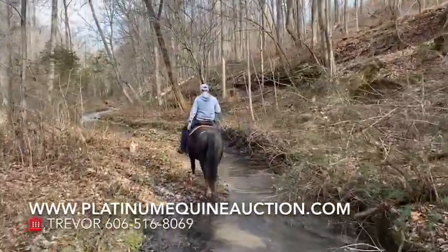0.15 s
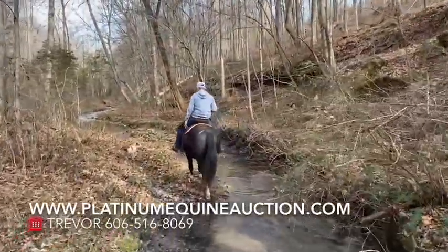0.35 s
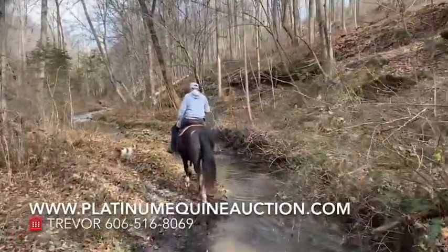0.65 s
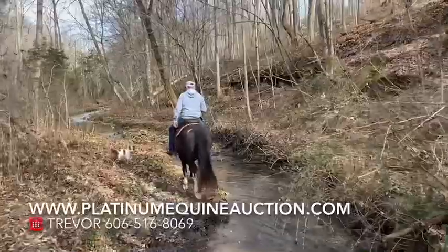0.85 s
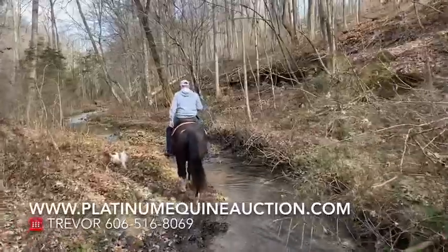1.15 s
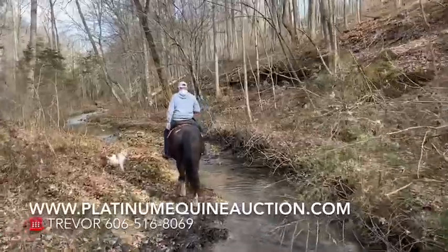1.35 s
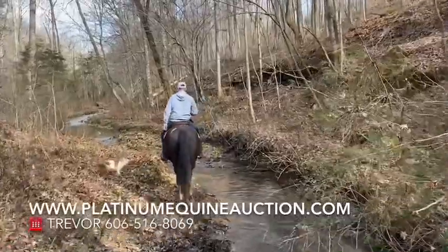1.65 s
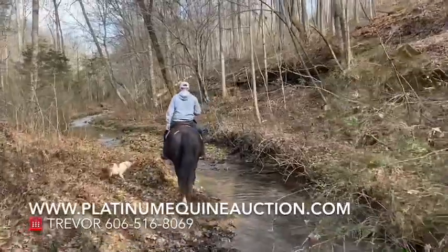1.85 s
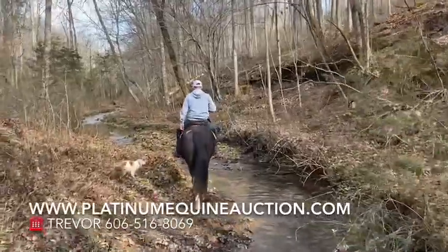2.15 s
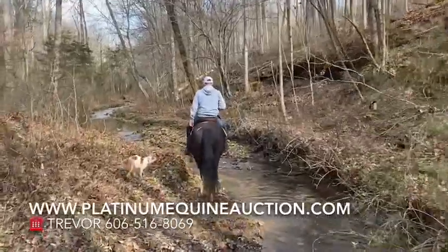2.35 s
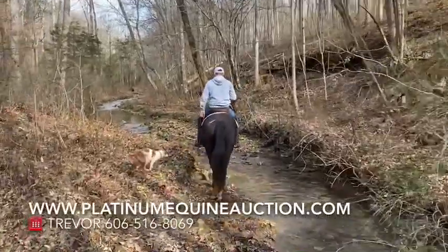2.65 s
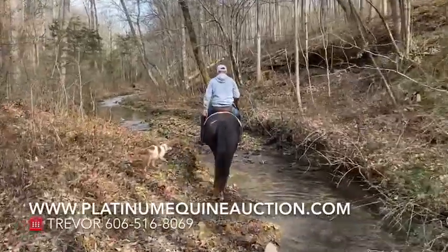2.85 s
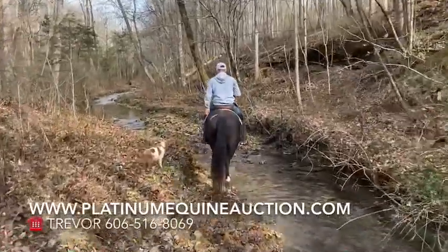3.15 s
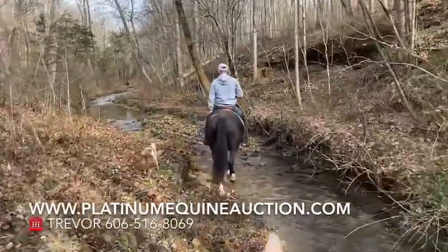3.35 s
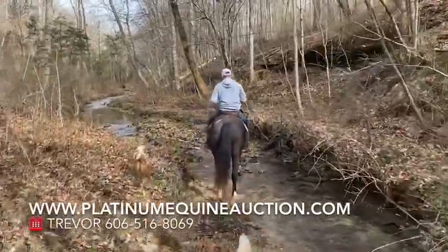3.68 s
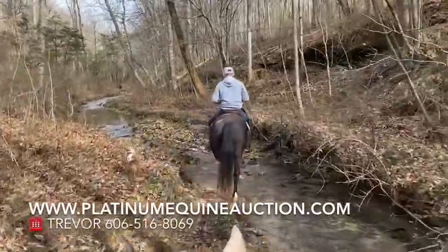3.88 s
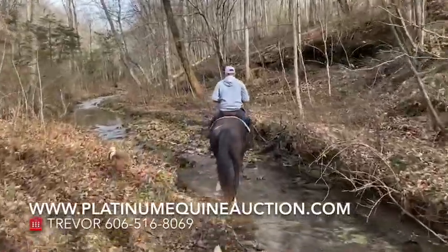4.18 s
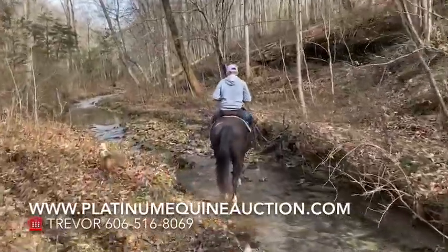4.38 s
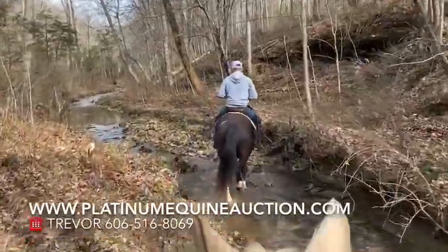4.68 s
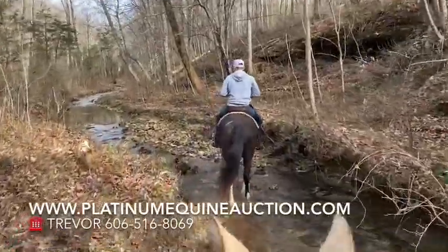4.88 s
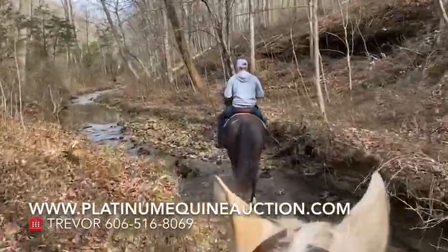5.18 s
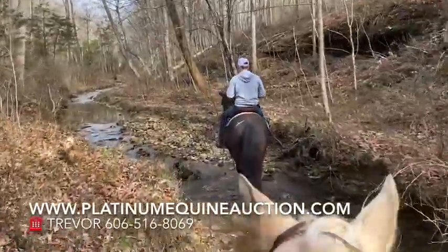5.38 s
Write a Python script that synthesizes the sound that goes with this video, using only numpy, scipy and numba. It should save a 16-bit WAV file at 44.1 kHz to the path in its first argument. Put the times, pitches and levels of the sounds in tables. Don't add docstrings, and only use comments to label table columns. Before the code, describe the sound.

Horses walk through a shallow creek, hooves splashing, plopping and thudding on the stream bed, with gurgles, spatter and a faint far engine.

```python
import sys
import numpy as np
from scipy import signal
from scipy.fft import rfft, irfft, next_fast_len
from scipy.io import wavfile
from scipy.ndimage import uniform_filter1d, map_coordinates
from numba import njit

SR = 44100
rng = np.random.default_rng(int(sys.argv[2]) if len(sys.argv) > 2 else 0)


def volts_from_db(level):
    exponent = np.asarray(level, float) / 20
    return 10 ** exponent


def dump_mix(stems):
    frames = np.atleast_2d(stems).T
    limited = np.clip(frames, -1, 1)
    pcm = np.round(limited * 32767).astype(np.int16)
    wavfile.write(sys.argv[1], SR, pcm)


N = 243431

# start_s, first_pitch_hz, last_pitch_hz,
# peak_db, last_gulp_db
HOOF_PLUNGES = [(.51, 635, 338, -16.5, -17.5), (1.224, 826, 170.8, -17.5, -24), (1.365, 775, 386, -19, -23),
                (1.974, 710, 164.6, -15, -22.5), (2.067, 417, 194, -17.5, -28),
                (2.537, 1036, 155, -25, -21), (3.247, 1150, 434, -21.5, -23),
                (3.738, 698, 92.7, -16.5, -24.5), (4.326, 532, 280, -24.5, -19.5),
                (4.718, 1444, 172, -16, -20.5), (5.407, 680, 184, -26, -16.5)]

APART_HZ = 7500
IN_STEP_HZ, HALF_TURN_HZ = 6970, 2040


def unit(x):
    return x / np.sqrt(np.mean(x ** 2) + 1e-20)


def along(points, hz):
    f, v = np.transpose(points)
    return np.interp(np.log(hz + 1), np.log(f + 1), v)


def curves(rows):
    s, *cols = np.transpose(rows)
    return [np.interp(np.arange(N) / SR, s, c) for c in cols]


def wobble(rate):
    knots = rng.standard_normal(int(N * 60 / SR) + 4)
    return map_coordinates(knots, [np.arange(N) * rate / SR])


def filtered(x, response):
    m = next_fast_len(N + SR // 2)
    return irfft(rfft(x, m) * response(np.fft.rfftfreq(m, 1 / SR)), m)[..., :N]


def coloured_noise(spectrum, noise):
    return unit(filtered(noise, lambda hz: volts_from_db(along(spectrum, hz))))


@njit
def bubbles(s, hz, size, cycles, phase, onset, glide, count, sr):
    out = np.zeros(count)
    for k in range(len(s)):
        life = cycles[k] / hz[k] * sr
        mid = int(s[k] * sr)
        for i in range(max(0, mid - int(2 * life)), min(count, mid + int(3 * life))):
            u = (i - mid) / life
            v = u / onset if u < 0 else u / (2 - onset)
            turns = cycles[k] * u * (1 + glide * u)
            out[i] += size[k] * np.exp(-2.77 * v * v) * np.sin(2 * np.pi * turns + phase[k])
    return out


def typed(rows, onset, glide):
    s, hz, db, cycles = np.transpose(rows).astype(float)
    phase = 2 * np.pi * rng.random(len(s))
    return bubbles(s, hz, volts_from_db(db), cycles, phase, onset, glide, N, SR)


def swarm(spectrum, centre_hz, octaves, cycles, spread_db, noise_share, count):
    pair = []
    for _ in range(2):
        u, g = rng.random((count, 3)), rng.standard_normal((count, 2))
        size = volts_from_db(spread_db * np.minimum(-np.log(1 - u[:, 1]), np.sqrt(3)))
        hz = np.clip(centre_hz * 2 ** (octaves * g[:, 0]), 40, SR / 2.5)
        lengths = cycles * np.exp(0.4 * g[:, 1])
        grains = bubbles(u[:, 0] * N / SR, hz, size, lengths, 2 * np.pi * u[:, 2], 0.35, 0.015, N, SR)
        z = rfft(grains)
        power = np.abs(uniform_filter1d(np.abs(z) ** 2, size=1500))
        flat = irfft(z / np.sqrt(power + power.max() / 20), N)
        share = np.clip(noise_share, 0, 1)
        pair.append(np.sqrt(1 - share) * unit(flat) + np.sqrt(share) * rng.standard_normal(N))
    return coloured_noise(spectrum, np.array(pair))


def swells(rows, rise):
    t = np.arange(N) / SR
    return np.sqrt(sum(volts_from_db(2 * db - 20 * np.maximum(t - s, (s - t) / rise) / fall) for s, db, fall in rows))


def valley_rumble():
    # frequency_hz, level_db_per_hz
    rumble_spectrum = [(12, -36), (20, -29), (47, 4.5), (97, 1.5), (160, -5), (210, -17), (350, -120)]
    rumble = coloured_noise(rumble_spectrum, rng.standard_normal((2, N)))
    return volts_from_db(-46.0 + 0.84 * wobble(3.475)) * rumble


def water():
    # time_s, mist_db
    wash = [(0, -50.5), (.3, -42.5), (.6, -47), (.92, -48.5), (1.18, -49), (1.4, -41), (1.6, -51.5),
            (1.8, -51), (1.96, -44.5), (2.15, -53.5), (2.4, -51.5), (2.54, -43), (3.05, -53.5),
            (3.14, -50.5), (3.3, -54.5), (4.2, -56), (5.0, -55.5), (5.52, -54)]
    # peak_s, peak_db, fall_10db_s
    kick_rows = [(.29, -40.5, 0.41), (.84, -43, 0.13), (1.42, -38, 0.15), (1.65, -42, 0.1),
                 (1.96, -40.5, 0.16), (2.2, -37.5, 0.03), (2.54, -42, .1), (2.65, -44.5, 0.24),
                 (3.13, -43, 0.16), (3.33, -40.5, 0.1125), (3.63, -40, 0.01), (3.74, -39, 0.0962),
                 (4.01, -41, 0.0647), (4.34, -37.5, 0.07), (1.09, -44, 0.05), (4.75, -42.5, 0.11),
                 (4.92, -46, 0.02), (5.345, -45, 0.06), (5.12, -42.5, 0.0854), (5.4, -38.5, 0.08)]
    # peak_s, peak_db, fall_10db_s
    push_rows = [(.28, -30, 0.08), (.59, -36.5, 0.1), (.84, -27.5, 0.0308), (1.12, -33, 0.05),
                 (1.22, -20, 0.0011), (1.41, -26, 0.01), (1.51, -42, 0.1), (1.68, -28.5, 0.04),
                 (1.81, -42, 0.3), (2.0, -31, 0.05), (2.25, -31.5, 0.0572), (2.41, -36, 0.04),
                 (2.575, -33, 0.11), (2.875, -32, 0.09), (3.21, -36.5, 0.13), (3.42, -35.5, 0.13),
                 (3.6, -34.5, 0.13), (3.83, -38, 0.13), (4.06, -37, 0.08), (4.165, -37.5, 0.09),
                 (4.42, -41.5, 0.25), (4.77, -34.5, 0.08), (4.68, -37.5, 0.06), (5.15, -37, 0.07),
                 (2.37, -35.5, .06), (1.065, -34.5, .05), (5.41, -26.5, 0.05), (.05, -39, 0.24)]
    # frequency_hz, level_db_per_hz
    churn_spectrum = [(35, -19.5), (60, -2.5), (90, -0.5), (151, -5.5), (281, 0.5), (403, -8), (595, -5.5),
                      (1570, -18), (2500, -20), (3250, -62), (5500, -120)]
    crackle_spectrum = [(700, -2), (1600, -15.5), (4500, -21.5)]
    spray_spectrum = [(530, 1.5), (900, -4.5), (1080, -6), (1620, -7.5), (3760, -9), (5730, -12.5),
                      (7170, -20), (8400, -12), (10900, -59), (18500, -120)]
    mist_spectrum = [(5000, -7), (6000, -6), (7200, -1.5), (8500, -5.5), (10500, -9), (13000, -16),
                     (16000, -22)]

    wash_db, = curves(wash)
    swing_db = wash_db - wash_db.mean()
    kicks = swells(kick_rows, rise=.55)
    pushes = swells(push_rows, rise=0.65)
    spray_gain = np.hypot(kicks, volts_from_db(-50 + 0.56 * swing_db))
    mist_gain = np.hypot(volts_from_db(-11) * kicks, volts_from_db(wash_db))
    churn_gain = np.hypot(pushes, volts_from_db(-47 + 0.247 * swing_db))

    churn = swarm(churn_spectrum, centre_hz=550, octaves=1.1, cycles=3.6, spread_db=2.2,
                  noise_share=.33, count=4500)
    spray = swarm(spray_spectrum, centre_hz=2575, octaves=.9, cycles=4.4, spread_db=3.5,
                  noise_share=0.58, count=9000)
    mist = swarm(mist_spectrum, centre_hz=8820, octaves=0.46, cycles=2.4, spread_db=2.0,
                 noise_share=0.58, count=14000)
    crackle = swarm(crackle_spectrum, centre_hz=1700, octaves=0.622, cycles=5.5, spread_db=2.5,
                    noise_share=0.32, count=2500)
    surge = wobble(48)
    return (churn_gain * volts_from_db(-1.4 + 1.9 * surge) * (churn + volts_from_db(-8.5) * crackle)
            + spray_gain * volts_from_db(2.0 + .9 * surge + 1.5 * wobble(30)) * spray
            + mist_gain * volts_from_db(1.55 + .8 * surge + 1.2 * wobble(21.98)) * mist)


def froth(count, up=1, over_db=0):
    # start_s, length_s, middle_pitch_hz, peak_db
    collapses = [(0.247, .025, 805, -24.5), (.272, .04, 960, -25), (.826, 0.0196, 798, -29.5),
                 (.886, 0.02324, 813, -28.5), (.44, .025, 990, -31), (1.389, .014, 806, -24.5),
                 (2.003, .018, 650, -28), (3.22, 0.00822, 703, -30.5), (3.765, .014, 1510, -32.5),
                 (3.914, .02, 1250, -31), (4.15, .03, 398, -35), (1.418, .014, 750, -28.5),
                 (5.391, 0.0116, 860, -30.5)]
    s, length, hz, db = np.transpose(collapses)[:, :, None]
    when = rng.random((len(collapses), count))
    size, loud, life = rng.standard_normal((3, len(collapses), count))
    starts = s + length * (np.arange(count) + when) / count
    pitches = up * hz * 2 ** (.33 * size)
    levels = db + over_db + 2 * loud
    cycles = 2.7 * 2 ** (life / 2)
    cols = (starts, pitches, levels, cycles)
    return list(np.reshape(cols, (len(cols), -1)).T)


def plunges():
    gulp_cycles = [1.57, 2.54, 1.8]
    rows = []
    for s, first_hz, last_hz, db, last_db in HOOF_PLUNGES:
        hz = np.geomspace(first_hz, last_hz, 3)
        starts = s + 0.9 * (np.cumsum(1 / hz) - 1 / first_hz)
        rows += zip(starts, hz, (db, db - 4, last_db), gulp_cycles)
    return rows


def bank_scatter(near):
    # frequency_hz, t60_s
    banks = [(100, 0.072), (1000, 0.068), (8000, 0.024)]
    hz, t, z = signal.stft(rng.standard_normal((2, SR // 4)), SR, nperseg=256)
    tail = signal.istft(z * volts_from_db(-60 * t / along(banks, hz)[:, None]), SR, nperseg=256)[1]
    late = np.pad(near, (int(.003 * SR), 0))[None]
    return signal.fftconvolve(late, tail / np.linalg.norm(tail[0]), axes=1)[:, :N]


def hooves():
    # peak_s, pitch_hz, peak_db, length_cycles
    thuds_and_pockets = [(.008, 265.7, -28, 6.8), (.074, 265, -22, 2.35), (.232, 157, -25, 1.5),
                         (.568, 279, -22.5, 2.4), (.823, 264, -27, 3.8), (1.442, 106.8, -19, 1.3),
                         (1.511, 155, -22, 0.92), (1.669, 212, -24, 3.2), (1.723, 250, -25, 2.3),
                         (1.748, 243, -19, 1.3), (1.768, 92.7, -16, 2.3), (2.345, 78.5, -22.5, 3.3),
                         (2.383, 142.6, -28, 4), (2.42, 244.5, -17.5, 1.22), (2.606, 256, -21, 1.14),
                         (2.699, 98, -25.5, 3.8), (5.21, 119, -26, 1.5), (3.2, 160, -18.5, 1.6),
                         (3.335, 190, -25.5, 2.4), (3.417, 265, -17.5, 1.4), (3.579, 241, -18, 0.47),
                         (3.65, 217, -21, 1.38), (3.697, 245, -25.5, 2), (.846, 352, -19, 2.7),
                         (1.229, 284, -20.5, 3.2), (1.422, 250, -25, 2.1), (4.78, 188, -30, 12), (4.174, 650, -27, 2.8),
                         (3.81, 500, -27, 2.3), (.63, 201, -30.5, 5.8),
                         (.028, 315, -26, 5.9), (.071, 527, -27.5, 3.9), (.253, 324, -22, 2.9),
               (0.2786, 520, -17.5, 2.1), (.34, 973, -28, 4.5), (4.396, 762, -16.5, 3.6),
               (.835, 774.7, -21.5, 8.5), (.836, 368, -19.5, 8.3), (.856, 330, -13.5, 2.5),
               (.859, 639, -19.5, 4.14), (.867, 304, -15, 2.66), (1.1, 401, -17.5, 2.51),
               (1.194, 313, -24, 2.75), (1.275, 1363, -22.5, 3.2), (1.422, 450, -22.5, 2.06),
               (1.658, 583, -29.5, 10), (1.697, 310, -19, 3.1), (1.816, 311.5, -19.5, 1.78),
               (2.015, 370, -24, 5.3), (2.082, 788, -22.5, 2.48), (2.26, 547, -19, 2.7),
               (2.272, 460, -19.5, 1.5), (2.279, 326, -19.5, 3.55), (2.568, 832, -25.5, 4.7),
               (2.573, 424, -23.5, 5.4), (3.25, 623, -17, 3.7), (3.321, 383, -25, 3.3),
               (3.489, 559, -23, 3.14), (3.602, 666, -22, 3.3), (4.154, 295, -31.5, 5.5)]
    # peak_s, pitch_hz, peak_db, length_cycles
    drops = [(.234, 2970, -24.5, 4), (.246, 7470, -24.5, 4.7), (.293, 1700, -22, 2),
             (.463, 6400, -13.5, 1.3), (.799, 2574, -24, 3.45), (.801, 1980, -22.5, 5),
             (.908, 1460, -18.5, 1.96), (.409, 850, -22.5, 2.5), (1.391, 1493, -18, 1.74),
             (1.412, 2396, -18.5, 2.9), (1.425, 2070, -23.5, 4), (1.434, 2880, -22, 1.7),
             (1.864, 5400, -20.5, 1.25), (1.873, 4910, -23, 5.6), (1.972, 2711, -20.5, 4.8),
             (2.137, 2330, -21.5, 1.73), (2.524, 2855, -16, 1.8), (2.525, 4400, -17.5, 2.2),
             (2.537, 4470, -21.5, 3.3), (3.328, 2630, -21.5, 1.8), (3.345, 2250, -25, 3.6),
             (3.633, 3720, -18, 2.6), (1.206, 2510, -28.5, 5.1), (4.367, 2050, -23, 2.3),
             (4.462, 1950, -27.5, 1.8), (4.704, 3200, -25.5, 1.2), (5.113, 3210, -22.5, 2),
             (5.388, 3760, -16.5, 3.6), (5.397, 4030, -19.5, 3.2)]
    droplets = froth(count=9, up=2.2, over_db=-7.5)
    plops = thuds_and_pockets + froth(count=6) + droplets
    ticks = [(s - 0.00039, 2400, db - 7.5, .8) for s, _, _, db, _ in HOOF_PLUNGES]
    near, aside = [typed(plops, onset=0.83, glide=0.0257)
                   + typed(plunges(), onset=0.74, glide=-0.023)
                   + typed(drops + ticks, onset=0.47, glide=0.008) for _ in range(2)]
    return np.array([near, aside]) * volts_from_db([[-2.3], [-2.5]]) + volts_from_db(-15) * bank_scatter(near)


def wake():
    # peak_s, pitch_hz, peak_db, #
    gurgles = [(0.148, 365, -29.5, 4.1), (0.097, 530, -32, 4.2), (0.092, 960, -29.5, 3.9),
               (0.331, 890, -29, 5.3), (0.377, 710, -30.5, 3.5), (0.45, 800, -28.5, 7.6),
               (0.53, 1220, -29.5, 6.8), (1.055, 770, -33, 4), (0.653, 302, -32, 3.2),
               (1.142, 1090, -30.0, 3.4), (1.328, 710, -34, 3.4), (1.366, 550, -21.5, 4.2),
               (1.493, 560, -31, 2.1), (1.617, 520, -32.5, 3.5), (2.029, 1090, -33.5, 4.7),
               (2.14, 670, -32.0, 5.1), (2.205, 630, -33, 6.7), (2.435, 500, -28, 5.7),
               (2.537, 760, -25, 2.2), (2.665, 910, -28.5, 5.5), (2.871, 710, -27, 1.8),
               (2.88, 860, -32, 3.4), (2.811, 306, -30.5, 2.8), (1.53, 199, -30.5, 3.9),
               (2.9, 800, -33, 2.5), (2.954, 127, -27.5, 2.4), (3.7, 570, -33.0, 4.6),
               (3.393, 360, -31, 3.5), (3.617, 670, -30, 3.5), (3.625, 1220, -30.5, 4.5),
               (3.3, 1350, -33.0, 5.2), (4.5, 800, -31.0, 1.8), (3.622, 133, -29, 2.5),
               (3.6, 1360, -35, 3.7), (0.345, 310, -27.5, 3.3), (4.019, 1020, -31, 3.1),
               (4.015, 530, -32.5, 3), (1.122, 380, -28.5, 7.5), (4.8, 1200, -29, 5),
               (4.686, 820, -31.5, 5.8), (4.705, 720, -30, 3.0), (4.737, 910, -32, 3), (4.667, 550, -34, 4),
               (4.782, 670, -34.5, 5.8), (5.3, 605, -32, 3.5), (4.3, 1130, -33.0, 4.8),
               (5.147, 1000, -32.0, 3.7), (5.411, 690, -22.5, 4),
               (.224, 685, -29, 3.7), (.249, 930, -20, 2.1), (.26, 740, -20.5, 4.8), (.277, 540, -20.5, 5),
             (.279, 860, -19, 1.8), (.295, 545, -19, 2.1), (.286, 520, -17.5, 2.5), (.323, 372, -27, 1.9),
             (.339, 590, -28, 1.5), (.804, 345, -24, 1.3), (.828, 800, -23, 2), (.893, 580, -25, 3.5),
             (.903, 925, -24, 2.6), (1.419, 930, -24, 3.2), (1.429, 640, -20.5, 3.7),
             (2.001, 776, -21, 2.5), (2.683, 635, -27, 1.5), (2.716, 402, -27.5, 2.1),
             (3.223, 545, -24, 2.7), (3.33, 320, -27, 1.7), (3.448, 320, -30, 3), (3.588, 505, -28.5, 7.8),
             (3.618, 293, -28, 4.2), (3.642, 468, -26, 1.4), (4.561, 374, -25.5, 1.5), (4.17, 560, -26, 2)]
    # peak_s, pitch_hz, peak_db, length_cycles
    spatter = [(0.246, 7500, -26.5, 7.1), (0.33, 3220, -29.0, 5.2), (0.349, 7500, -31.0, 7.1),
               (0.282, 4072, -27, 5), (0.656, 4080, -26, 4.6), (0.756, 4950, -30.5, 8),
               (0.827, 1300, -28.5, 5), (0.848, 2390, -32, 2.6), (0.883, 2600, -32, 3.2),
               (0.884, 1390, -29.0, 2.7), (0.927, 3010, -33, 6.4), (0.942, 1910, -31.5, 3.1),
               (1.274, 3500, -28, 4.7), (1.307, 3780, -26, 3.0), (1.323, 6950, -28, 10.0),
               (1.365, 2390, -29, 6.2), (1.388, 5530, -30.0, 5.0), (1.434, 6950, -28.5, 4.7),
               (1.915, 6950, -29, 4.7), (0.311, 4843, -31, 5), (1.973, 1300, -28.5, 3.9),
               (1.977, 2500, -31, 3), (2.007, 2300, -31.5, 3), (2.036, 5530, -29, 3.5),
               (2.082, 1300, -26, 1.2), (4.341, 3424, -31, 5), (2.495, 2600, -35.5, 4.6),
               (2.568, 1840, -31, 3.2), (2.602, 5970, -30.0, 5.5), (2.498, 4843, -31, 5),
               (3.284, 1210, -32, 4), (3.315, 1630, -27, 1.8), (3.334, 3010, -27, 3.9),
               (3.639, 4080, -30, 5.7), (3.735, 1880, -30.5, 5.7), (3.931, 2050, -31.0, 4.6),
               (4.322, 1880, -28, 4.2), (4.323, 4050, -27.5, 4.9), (4.395, 1290, -32.5, 6.4),
               (5.112, 2500, -28, 3.2), (0.427, 1712, -33, 6), (5.343, 4400, -32, 3.8),
               (5.426, 3780, -29.0, 4.1)]
    near, aside = [typed(gurgles, onset=0.78, glide=0.018)
                   + typed(spatter, onset=.55, glide=0.0091) for _ in range(2)]
    return volts_from_db(-1.4) * np.array([near, aside])


def slaps():
    # start_s, peak_db, t60_s
    slap_rows = [(0.2448, -27.5, 0.05), (0.4605, -24, 0.058), (0.407, -27.5, 0.033), (.656, -28.5, .02),
                 (.798, -18, 0.038), (1.2274, -27, 0.067), (1.274, -17, 0.043), (1.364, -25, 0.033),
                 (1.39, -28.5, 0.027), (1.4324, -35, 0.036), (1.9709, -30.5, 0.031), (1.999, -32, 0.0272),
                 (2.523, -29, 0.0295), (3.22, -32, 0.038), (3.314, -29.5, 0.073), (3.3255, -22.5, 0.067),
                 (3.626, -26, .05), (3.6385, -24, 0.06), (3.7335, -28, 0.1), (3.987, -32, 0.11),
                 (4.004, -27, 0.11), (4.3196, -22.5, 0.066), (4.703, -26.5, .03), (4.7161, -26, 0.051),
                 (5.1078, -20, 0.092), (5.386, -15.5, 0.067)]
    # frequency_hz, level_db_per_hz
    slap_spectrum = [(300, -34), (800, 9), (3500, -1.5), (8000, -3.5), (12000, -14), (16000, -45)]
    t, shape = np.arange(N) / SR, np.zeros(N)
    for s, db, t60 in slap_rows:
        age = np.maximum(t - s, 0)
        fade_db = -60 * age / np.clip(t60, .005, .3)
        shape += volts_from_db(db - 8.5 + fade_db) * (1 - np.exp(-age / 0.0035))
    ragged_db = 3.5 * 3.0 * uniform_filter1d(rng.standard_normal(N), size=60)
    crackle = rng.standard_normal((2, N)) * volts_from_db(ragged_db)
    return shape * coloured_noise(slap_spectrum, crackle)


def film_snaps():
    # peak_s, peak_db
    snap_rows = [
        (.4628, -27),
        (.9255, -30),
        (2.9603, -32),
        (3.3283, -21),
        (3.632, -19.5),
        (3.987, -28),
        (4.704, -25.5),
        (5.1094, -25),
        (5.3874, -21.5),
        (5.4445, -38),
    ]
    # frequency_hz, level_db_per_hz
    snap_spectrum = [(500, -18), (2000, -4), (7000, 1), (12000, -8), (16000, -21)]
    t, t60_s = np.arange(N) / SR, 0.015
    shape = sum(volts_from_db(db - 9 - 60 * np.maximum(t - s, 3 * (s - t)) / t60_s) for s, db in snap_rows)
    return shape * coloured_noise(snap_spectrum, rng.standard_normal((2, N)))


def far_engine():
    # time_s, pitch_hz, level_db
    engine = [
        (2.7, 86, -49.5),
        (3.9, 75, -44),
        (4.6, 68.5, -42),
        (5.22, 64.2, -39.5),
        (5.52, 62.3, -44),
    ]
    hz, db = curves(engine)
    fade_in = np.clip((np.arange(N) / SR - 2.4) / 0.64, 0, 1)
    note = np.sqrt(2) * np.sin(2 * np.pi * np.cumsum(hz + 0.85 * wobble(8.2)) / SR)
    return fade_in * volts_from_db(db + 1.42 * wobble(6.5)) * note * [[1], [0]]


def scene():
    return valley_rumble() + water() + hooves() + wake() + slaps() + film_snaps() + far_engine()


def spacing_phase(hz):
    return np.pi * (hz - IN_STEP_HZ) / HALF_TURN_HZ * (hz > APART_HZ)


def port_tilt(hz):
    # frequency_hz, left_over_right_db
    left_db = [(200, 0), (380, 2), (700, 6.5), (1300, 6.5), (2400, 5.5), (5500, 7)]
    # frequency_hz, lead_radians
    left_lead = [(0, 0), (430, 0.63), (1200, 0.5), (2700, 0.85), (3300, 0.52), (3700, 0)]
    lead = np.interp(hz, *np.transpose(left_lead)) - spacing_phase(hz)
    return volts_from_db(along(left_db, hz) * (hz < 6350) / 2) * np.exp(.5j * lead)


def port_shares(hz):
    # frequency_hz, likeness_0_to_1
    likeness = [(60, 0.995), (170, 1), (690, 0.97), (1300, 0.6), (2200, 0.71), (2800, 1), (3300, 1)]
    diffuse = np.arccos(np.clip(along(likeness, hz), 0, 1)) / 2
    treble = 0.034 + .3 * (hz > APART_HZ) * np.cos(spacing_phase(hz) / 2) ** 2
    turn = np.where(hz < 3600, diffuse, treble)
    tilt = port_tilt(hz)
    mid = np.where(hz < 6350, np.abs(tilt + 1 / tilt) / 2, 1)
    band = (hz < 15760) * hz ** 2 / (hz ** 2 + 35 ** 2)
    return np.array([np.cos(turn), np.sin(turn)]) * band / mid


def top_cut(x):
    return signal.sosfilt(signal.butter(12, 15950, fs=SR, output="sos"), x)


def record(dry):
    common, apart = filtered(dry, port_shares)
    left_right = np.array([common + apart, common - apart])
    pair = filtered(left_right, lambda hz: np.array([port_tilt(hz), 1 / port_tilt(hz)]))
    return top_cut(pair)


dry = scene()
out = record(dry)
dump_mix(out)
```